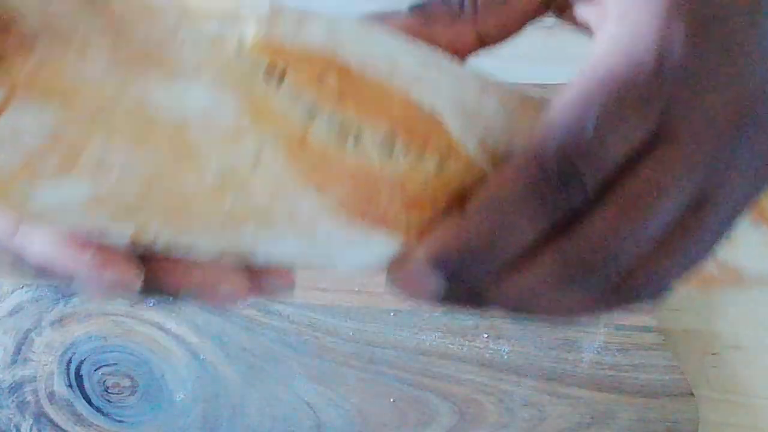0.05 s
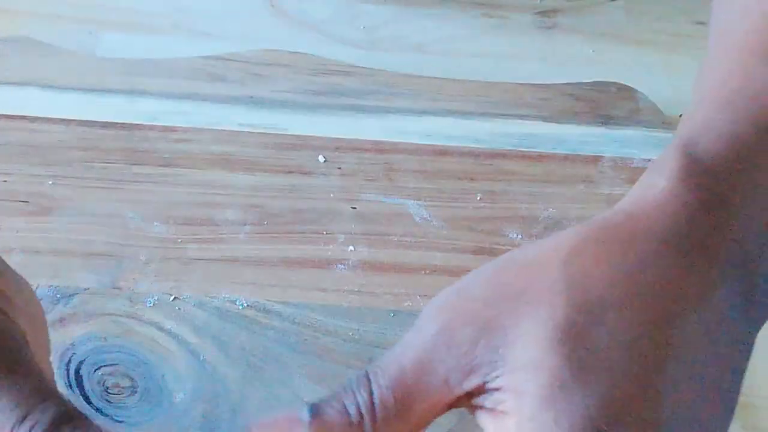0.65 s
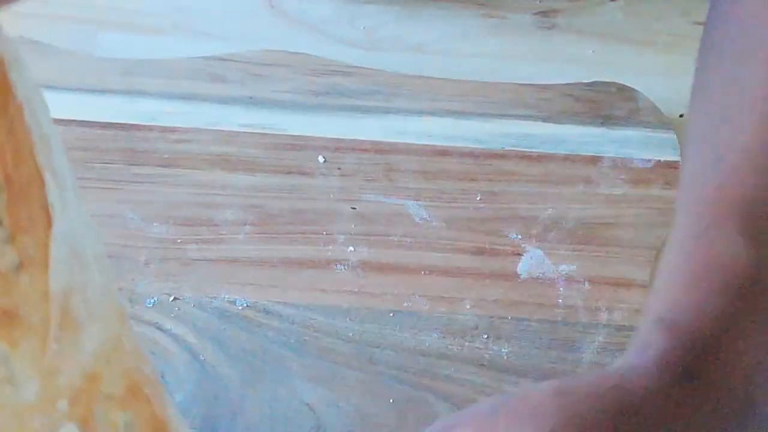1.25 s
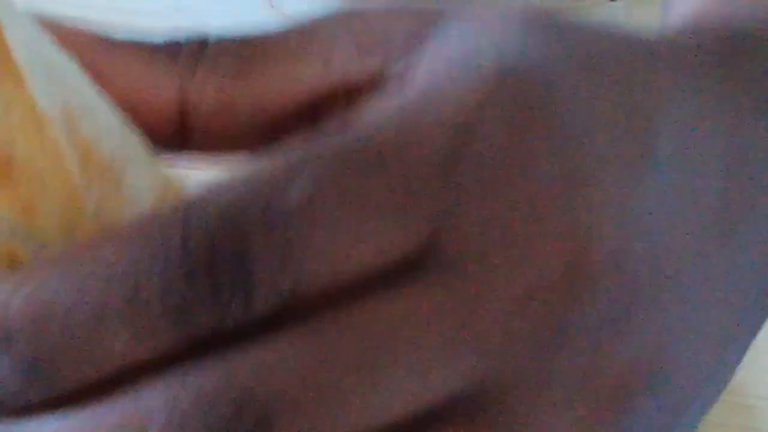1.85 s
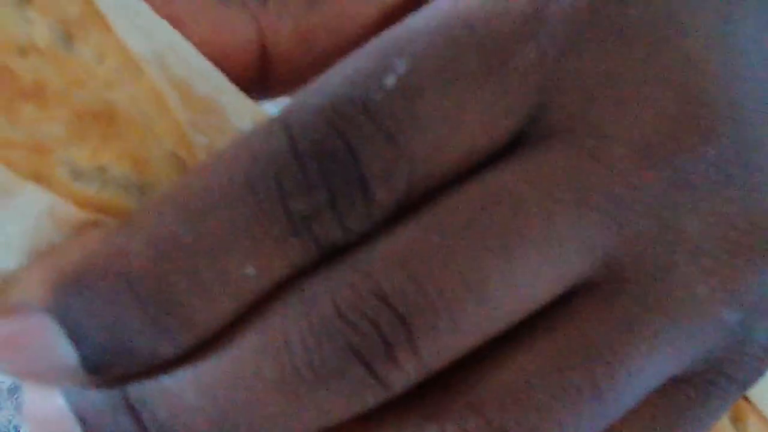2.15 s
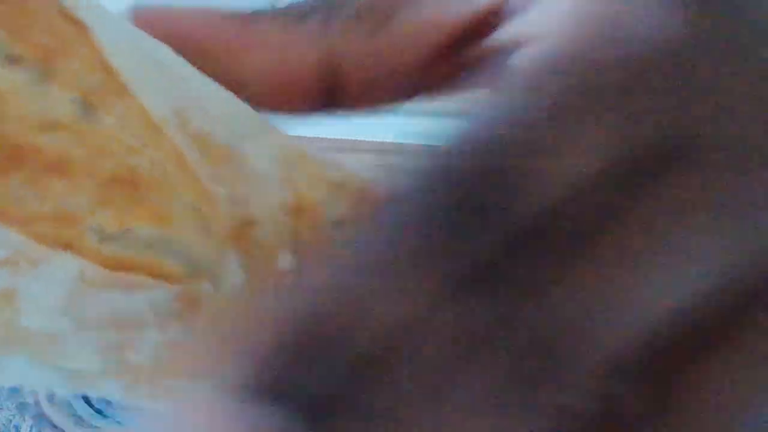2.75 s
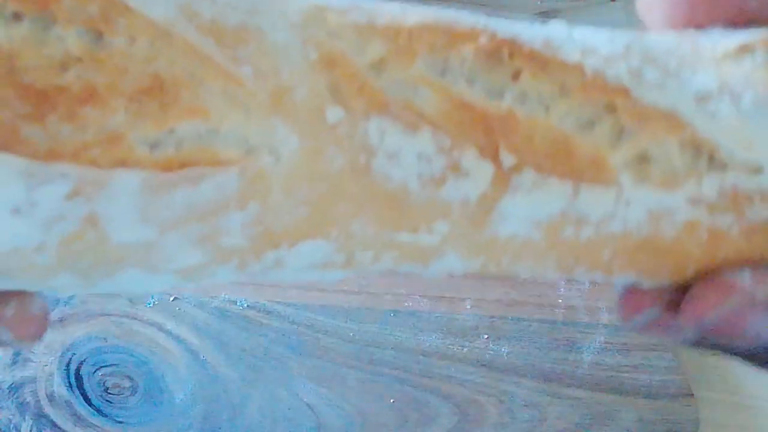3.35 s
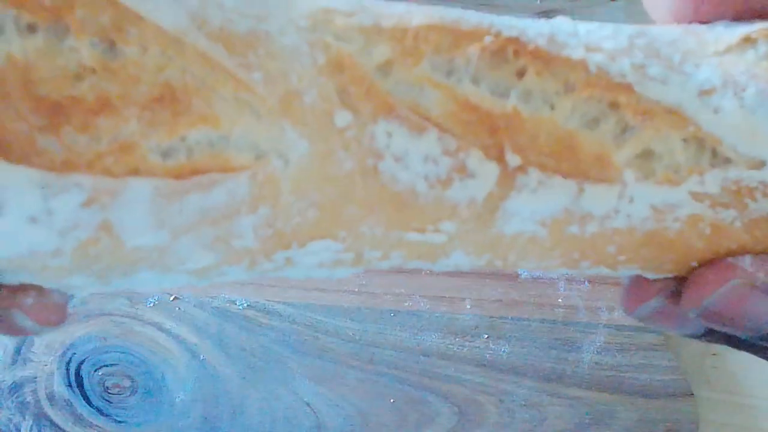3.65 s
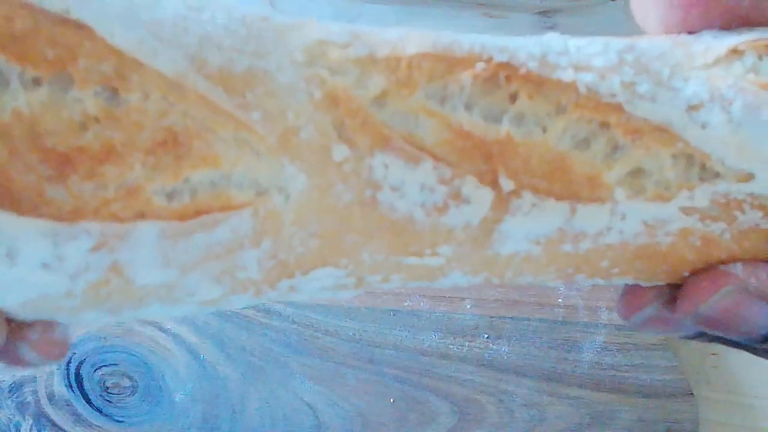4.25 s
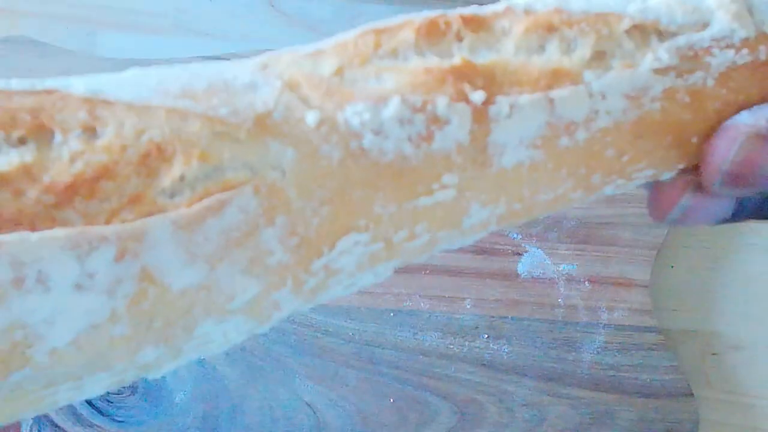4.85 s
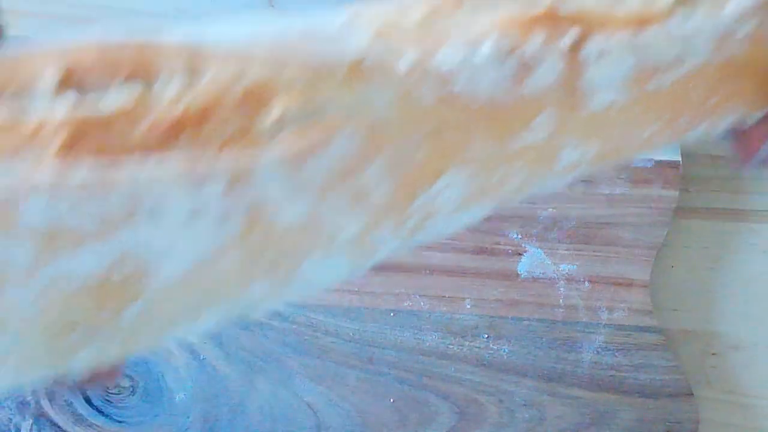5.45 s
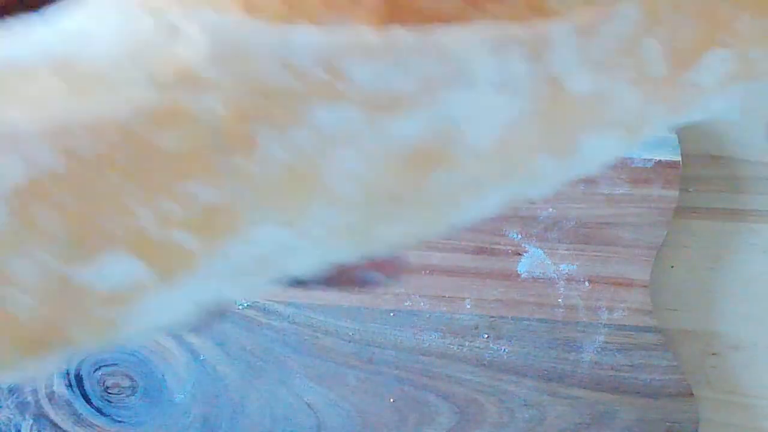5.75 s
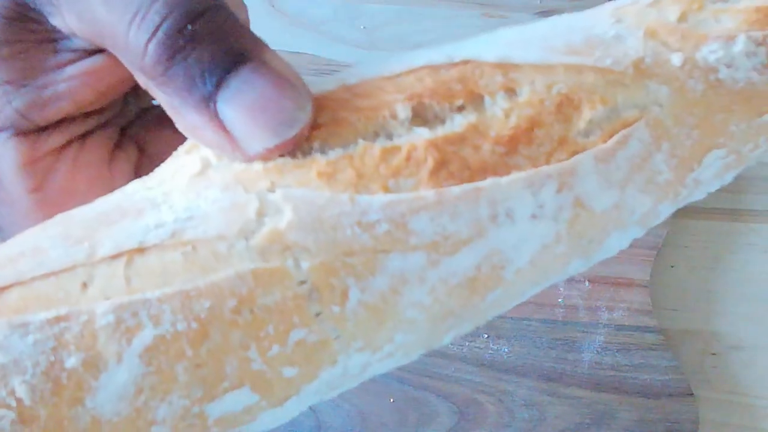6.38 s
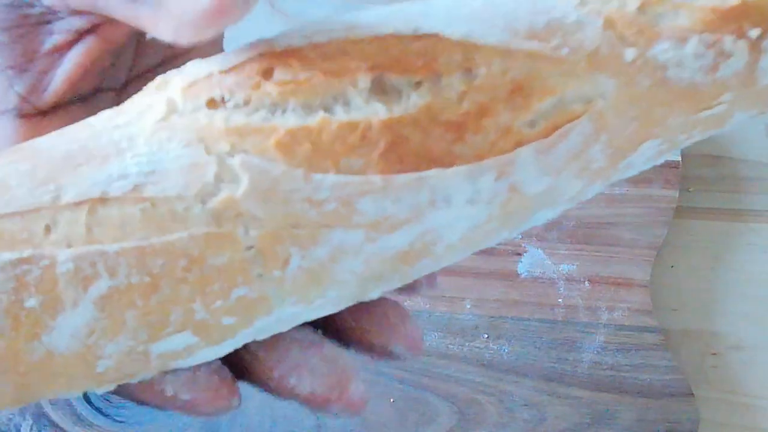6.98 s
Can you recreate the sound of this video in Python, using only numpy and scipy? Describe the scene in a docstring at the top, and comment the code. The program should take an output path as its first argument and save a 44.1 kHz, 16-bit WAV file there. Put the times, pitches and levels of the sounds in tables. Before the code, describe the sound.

Crisp bread crust snaps and crunches in five short clusters as fingers press a baked loaf, heard up close. Between the clusters, hands slide over the dry crust with a soft, hissy rasp, and one such stroke comes last. Each crack has a brief echo from a small room, which is otherwise quiet apart from a faint hiss and an appliance humming.

```python
"""Two hands lift, squeeze and turn a crusty baguette over a wooden board in a small hard room.
Air hisses and an appliance hums faintly throughout. The first squeeze comes at once: the crust snaps
in sharp cracks over fine crumbling, and the room echoes each crack. Then skin brushes over the floury
loaf. Four more squeezes follow, near 2.3, 3.8, 5.2 and 6.5 s, with brushing in between.
A last brush of the skin ends the scene."""
import sys
import numpy as np
from scipy import signal
from scipy.fft import rfft, irfft, next_fast_len
from scipy.io import wavfile
from scipy.ndimage import uniform_filter1d

SR = 44100
rng = np.random.default_rng(int(sys.argv[2]) if len(sys.argv) > 2 else 0)


def wrap_up_sound(samples):
    """Save the sound to the file named by the first command line argument, as 16-bit audio."""
    columns = np.atleast_2d(samples).T
    # keep every value between -1 and 1, then stretch to whole-number steps
    tamed = np.clip(columns, -1, 1)
    steps = np.round(tamed * 32767).astype(np.int16)
    wavfile.write(sys.argv[1], SR, steps)


N = 309582
TIME = np.arange(N) / SR
TOP_HZ = 15900  # the highest pitch the microphone lets through


def gain(db):
    """Turn decibels into a number to multiply by."""
    return 10 ** (np.asarray(db) / 20)


def set_level(x, db):
    """Scale a sound to an average (rms) level."""
    return x * gain(db) / np.sqrt(np.mean(x ** 2))


def unit_energy(x):
    """Scale a sound so that its squares add up to one."""
    return x / np.sqrt(np.sum(x ** 2) + 1e-18)


def add(track, start_s, sound):
    """Mix a sound into a track at a given time."""
    start = int(np.clip(start_s * SR, 0, N - 1))
    track[start:start + len(sound)] += sound[:N - start]


def look_up(points, hz):
    """Read between the rows of a table, with octaves evenly spaced."""
    pitches, values = np.transpose(points)
    return np.interp(np.log(np.maximum(hz, 1)), np.log(pitches), values)


def colour(x, points):
    """Make each frequency louder or softer as a table says."""
    size = next_fast_len(len(x))
    hz = np.fft.rfftfreq(size, 1 / SR)
    return irfft(rfft(x, size) * gain(look_up(points, hz)), size)[:len(x)]


def wander(per_s):
    """A smooth random curve that strays about one unit from zero."""
    step = max(int(SR / per_s), 1)
    stairs = np.repeat(rng.standard_normal(N // step + 1), step)
    return set_level(uniform_filter1d(stairs, step)[:N], 0)


def grains(per_s, spread_db):
    """Tiny random clicks: many weak ones, a few strong."""
    sizes = gain(spread_db * np.minimum(rng.exponential(size=N), 4))
    happens = rng.random(N) < per_s / SR
    return set_level(happens * sizes * rng.choice([-1, 1], N), 0)


def resonance(hz, centre_hz, width_hz):
    """Power at each frequency of something that rings; a wider peak dies sooner."""
    return 1 / (1 + ((hz ** 2 - centre_hz ** 2) / (hz * width_hz)) ** 2)


def low_cut(hz, edge_hz):
    """Share of the power left at each frequency when the lows are cut."""
    return 1 / (1 + (edge_hz / hz) ** 6)


def sharp_click(power):
    """The most sudden click with the given power at each frequency (minimum phase)."""
    cepstrum = irfft(np.log(power + 1e-18) / 2)
    half = len(cepstrum) // 2
    folded = np.r_[cepstrum[0], 2 * cepstrum[1:half], cepstrum[half], np.zeros(half - 1)]
    return irfft(np.exp(rfft(folded)))


# Tone of the air and hiss: (frequency [Hz], relative level [dB])
AIR_COLOUR = [(20, -18), (60, -15.5), (90, -19), (160, -13), (260, -13), (400, -14), (680, -14),
              (1000, -16), (1500, -19), (2200, -26), (3000, -27.5), (4200, -28), (8000, -29),
              (16000, -29.5)]


def air(level_db=-57):
    """Softly moving air and microphone hiss make a steady noise."""
    return set_level(colour(rng.standard_normal(N), AIR_COLOUR), level_db)


# Tones of the appliance: (frequency [Hz], level [dB])
HUM_TONES = [(59.5, -80), (155, -80.5), (177, -78.5), (212, -63), (435, -77.5), (486.3, -75),
             (637.7, -74.5), (667.2, -86), (724.9, -68.5), (868.5, -76), (1014, -75.5)]


def appliance_hum(drift_rad=0.12):
    """An appliance hums with faint tones that waver slightly in pitch."""
    return sum(set_level(np.sin(2 * np.pi * hz * TIME + drift_rad * wander(per_s=3.5)), db)
               for hz, db in HUM_TONES)


# Tone of the echoes: (frequency [Hz], relative level [dB])
ECHO_COLOUR = [(200, -15), (700, -15), (1700, 4), (2600, 4.5), (4000, 2), (6000, 1), (9000, 0.5),
               (16000, 3.5)]
# How long the echoes last: (frequency [Hz], time to fade by 60 dB [s])
ECHO_FADE = [(300, 0.26), (1300, 0.36), (3500, 0.3), (9000, 0.36), (16000, 0.26)]


def echoes(first_s=0.00068, build_s=0.002, bands=8):
    """The board and walls answer a click with dense echoes; each pitch band fades at its own pace."""
    t = np.arange(SR // 2) / SR
    noise, hz = rfft(rng.standard_normal(len(t))), np.fft.rfftfreq(len(t), 1 / SR)
    centres = np.geomspace(300, TOP_HZ, bands)
    tail = np.zeros(len(t))
    for centre, weights in zip(centres, np.eye(bands)):
        band = irfft(noise * look_up(np.c_[centres, weights], hz), len(t))
        tail += band * gain(-60 * t / look_up(ECHO_FADE, centre))
    fade_in = np.clip((t - first_s) / build_s, 0, 1)
    return unit_energy(colour(tail, ECHO_COLOUR) * fade_in)


def room(x, spots=4, stay_s=0.03):
    """The sound comes from changing spots along the loaf, each with its own echoes."""
    spot = (TIME // stay_s) % spots
    return sum(signal.oaconvolve(x * (spot == k), echoes())[:N] for k in range(spots))


# Air ringing under a hand: (start [s], end [s], pitch [Hz], peak width [Hz], ring gain [dB])
HAND_HOLLOWS = [(1.9, 2.66, 2020, 160, 7), (1.9, 2.66, 3470, 260, -4), (4.7, 5.096, 1780, 150, 5)]


def cupped_hand(x):
    """While a hand closes over the loaf, the air trapped under it rings along."""
    ringing = np.zeros(N)
    for start, end, hz, width_hz, db in HAND_HOLLOWS:
        covered = x * ((TIME > start) & (TIME < end))
        ringing += gain(db) * signal.lfilter(*signal.iirpeak(hz, hz / width_hz, fs=SR), covered)
    return x + ringing


# Tone of skin rubbing on crust: (frequency [Hz], relative level [dB])
RUB_COLOUR = [(300, -2.5), (900, -2), (1800, 4), (2800, 0.5), (4500, -3), (6500, -1), (11000, 0.5),
              (14000, 0), (16000, -5)]
# Strokes of skin: (middle [s], rough length [s], relative level [dB], treble tilt [dB per octave])
SKIN_STROKES = [(0.713, 0.054, -40.5, 1.5), (0.83, 0.22, -55, 0), (0.925, 0.02, -50, -1),
                (1.297, 0.08, -61, 1), (1.409, 0.044, -51.5, 2.5), (1.588, 0.075, -43.5, 0.5),
                (1.703, 0.048, -50.5, 0), (2.709, 0.027, -50, 0.5), (2.89, 0.12, -47.5, 1.5),
                (3.006, 0.21, -55.5, 0.5), (3.164, 0.086, -53, 0.5), (3.268, 0.097, -52, -1.5),
                (4.278, 0.1, -58, -1.5), (4.429, 0.23, -52, -1), (4.639, 0.26, -53, -1),
                (4.962, 0.11, -55.5, 2), (5.503, 0.071, -54, 0.5), (6.892, 0.085, -50, 0.5),
                (6.972, 0.048, -53.5, 1)]


def brushing(lift_hz=3900, grip_hz=4530, grip_s=1.1, bounce_gain=0.3):
    """Skin slips over flour grains; sound bouncing between hand and loaf makes the hiss hollow."""
    out = np.zeros(N)
    hz = np.fft.rfftfreq(SR // 2, 1 / SR) + 1
    flour = colour(grains(per_s=17000, spread_db=4.5), RUB_COLOUR)
    friction = set_level(flour * gain(wander(per_s=70)), -2)
    for middle, length, db, tilt_db in SKIN_STROKES:
        # the gap under the hand is wide while lifting, then narrower and higher in pitch once it grips
        hollow_hz = lift_hz if middle < grip_s else grip_hz
        touching = abs(TIME - middle) < 0.7 * length
        spectrum = rfft(friction[touching] * np.hanning(touching.sum()), SR // 2)
        bounce = 1 + bounce_gain * np.exp(-2j * np.pi * hz / hollow_hz)
        rasp = 1 + gain(-9) * resonance(hz, hollow_hz, width_hz=1500)
        tilt = gain(tilt_db * np.log2(np.maximum(hz, 1000) / 7000))
        add(out, TIME[touching][0], gain(db) * irfft(spectrum * bounce * rasp * tilt))
    return out


# Presses of the fingers: (firmest moment [s], build-up [s], release [s], strength [dB])
FINGER_PRESSES = [(0.19, 0.14, 0.33, -54.5), (0.50, 0.18, 0.11, -44.5), (2.13, 0.19, 0.2, -55),
                  (2.29, 0.12, 0.11, -49), (2.48, 0.11, 0.14, -49), (3.72, 0.062, 0.05, -46.5),
                  (3.82, 0.05, 0.11, -48.5), (3.92, 0.071, 0.1, -48), (4.88, 0.2, 0.42, -56.5),
                  (5.26, 0.15, 0.097, -47), (6.36, 0.18, 0.13, -56), (6.58, 0.15, 0.15, -47.5)]


def pressure_db(times, ease_db=17):
    """The fingers build up each press and ease off again; the firmest one counts."""
    presses = [db - ease_db * ((times - peak) / np.where(times < peak, build, release)) ** 2
               for peak, build, release, db in FINGER_PRESSES]
    return np.max(presses, axis=0)


# Tone of the crumbling: (frequency [Hz], relative level [dB])
CRUMBLE_COLOUR = [(300, -10), (900, -4.5), (1700, -3.5), (2600, -5), (3700, 3.5), (5000, -3.5), (7000, 0),
                  (9000, -5), (11000, -4), (16000, -7)]


def crumbling(spurt_db=2.4):
    """Tiny cell walls in the bread give way in uneven spurts while the fingers press."""
    crumbs = grains(per_s=1000, spread_db=4) * gain(spurt_db * wander(per_s=90))
    return gain(pressure_db(TIME)) * set_level(colour(crumbs, CRUMBLE_COLOUR), -4)


def splinters(count=290, tick_db=-33, growth=0.32, medium_press_db=-50, scatter_db=1.5):
    """Small flakes tick off unevenly, louder under a firmer press; gives rows like CRUST_CRACKS."""
    times = (np.arange(count) + rng.random(count)) * N / SR / count
    strength_db = tick_db + growth * (pressure_db(times) - medium_press_db)
    flake, body, snap, facing = scatter_db * rng.standard_normal((count, 4)).T
    return np.c_[times, strength_db + flake, strength_db - 9 + body, strength_db - 2.5 + snap, facing]


# Short-lived rings of the loaf's body: (pitch [Hz], peak width [Hz], relative level [dB])
LOAF_RINGS = [(715, 330, -5), (1530, 1550, -4), (2230, 4500, -7)]
# The clear cracks of the crust, with relative levels:
# (time [s], flake ring [dB], loaf body [dB], high snap [dB], share sent into the room [dB])
CRUST_CRACKS = [(0.052, -42, -50, -32, -1), (0.0973, -32, -28, -23.5, -1), (0.181, -17, -20.5, -10.5, -2),
                (0.2093, -24, -20.5, -21, -2), (0.2204, -28, -28.5, -43, 7), (0.2857, -27, -29, -21, 2),
                (0.3015, -15, -17.5, -32, 1), (0.346, -26, -30, -28, 2), (0.386, -23, -23.5, -21, -5),
                (0.4186, -5.5, -12.5, -9, -7), (0.4655, -20, -22.5, -21, -1),
                (0.4789, -12.5, -21.5, -26, -9), (0.4864, -21, -23, -19, -1), (0.497, -20, -26, -24, -3),
                (0.56, -23.5, -29, -24.5, 1), (1.9726, -31, -34, -43, 4), (2.0505, -23.5, -36, -47, 0.5),
                (2.088, -25, -32, -37, -6), (2.1127, -21.5, -28.5, -27, 5), (2.268, -28, -36, -29, -5),
                (2.3062, -26, -29, -23.5, 2.5), (2.3495, -27, -30, -36, -6), (2.3697, -24, -28, -23, -2),
                (2.4234, -27, -35, -25, 4), (2.446, -22, -40, -21, -3), (2.457, -22.5, -26, -29, 8.5),
                (2.565, -30, -36, -33, 7), (3.4655, -31, -34.5, -30, 4), (3.5689, -27, -41, -27, 0),
                (3.6433, -22, -30.5, -42, 8.5), (3.6814, -23, -31, -23, 0.5), (3.6897, -19, -23, -19, 2),
                (3.705, -19.5, -25, -22, 6), (3.7964, -25.5, -30, -33, 7), (3.8637, -15.5, -8.5, -18, 0),
                (3.87, -22, -27.5, -20, 12.5), (4.0054, -36, -47, -31, 0), (4.2561, -29.5, -34, -31, 2),
                (4.7273, -31, -24.5, -39, 3.5), (4.8103, -29.5, -33.5, -32, 5), (4.858, -29, -34, -44, 8.5),
                (4.8956, -30, -46, -29, 3), (4.9381, -29, -47, -25.5, -4), (5.062, -30, -49, -30, 8),
                (5.117, -42, -44, -24, 3), (5.143, -34, -23.5, -23.5, 1), (5.2048, -19.5, -26.5, -17, 0),
                (5.246, -31, -50, -28, 1), (5.2679, -12, -21.5, -13.5, 1), (5.2815, -32, -24.5, -36, 2),
                (5.3396, -35, -48, -24, -9), (6.099, -37, -49, -33, -7), (6.132, -26.5, -33.5, -27, 2.5),
                (6.192, -30, -33, -27.5, 0), (6.2688, -30.5, -36, -20.5, -1), (6.3324, -31, -42, -28, -1),
                (6.3524, -31.5, -37, -24, 7), (6.4674, -25, -30, -21, -3), (6.4712, -22.5, -27, -26, -7),
                (6.4962, -33, -45, -25, -5), (6.5128, -25.5, -31, -24, -3), (6.5794, -18, -22.5, -19, 3.5),
                (6.6022, -30, -36, -17.5, 1.5), (6.6051, -23, -27, -25, 2), (6.6415, -24, -39, -32, -9),
                (6.7178, -38, -39, -29, 0)]


def cracks(flake_hz=4150, range_octaves=0.33, thin_db=11, snap_hz=10200, run_s=0.0014, size=512):
    """A flake lets go and the break runs on for an instant; gives the near sound and the room's share."""
    near, to_room = np.zeros(N), np.zeros(N)
    t, hz = np.arange(size) / SR, np.fft.rfftfreq(size, 1 / SR) + 1
    loaf = sum(gain(db) ** 2 * resonance(hz, pitch, width) for pitch, width, db in LOAF_RINGS)
    loaf *= resonance(hz, centre_hz=1660, width_hz=5500)
    snap = resonance(hz, snap_hz, width_hz=7500) * resonance(hz, snap_hz, width_hz=15000)
    for start, flake_db, loaf_db, snap_db, room_db in np.vstack([CRUST_CRACKS, splinters()]):
        # thin flakes, with more snap than body, ring higher; thick ones ring lower
        thinness = np.tanh((snap_db - loaf_db) / thin_db)
        ring_hz = flake_hz * 2 ** (range_octaves * thinness)
        flake = resonance(hz, ring_hz, width_hz=1800) * low_cut(hz, 3200)
        parts = [(flake_db, flake), (loaf_db, loaf), (snap_db, snap)]
        power = sum(gain(db) ** 2 * part / part.mean() for db, part in parts)
        click = gain(0.5) * sharp_click(power * low_cut(hz, 540))  # a small source gives off no bass
        tearing = unit_energy(rng.standard_normal(size) * t * np.exp(-2 * t / run_s))
        # a crack that faces away arrives more blurred and sends more into the room
        blur = gain(-8 + 0.7 * room_db)
        force = unit_energy((t == 0) + blur * tearing)
        add(near, start, np.convolve(force, click))
        add(to_room, start, click * gain(room_db))
    return near, to_room


def scene():
    """The loaf in its room, heard by one microphone on both channels."""
    near_cracks, cracks_to_room = cracks()
    crumbs, skin = crumbling(), brushing()
    close = cupped_hand(near_cracks + crumbs) + skin
    far = room(gain(-3.5) * cracks_to_room + gain(-8.5) * (crumbs + skin))
    return np.tile(close + far + air() + appliance_hum(), (2, 1))


def record(dry):
    """The microphone cuts off the very highest treble."""
    treble_cut = signal.ellip(10, 0.2, 70, TOP_HZ, fs=SR, output="sos")
    return signal.sosfilt(treble_cut, dry)


dry = scene()
out = record(dry)
wrap_up_sound(out)
```